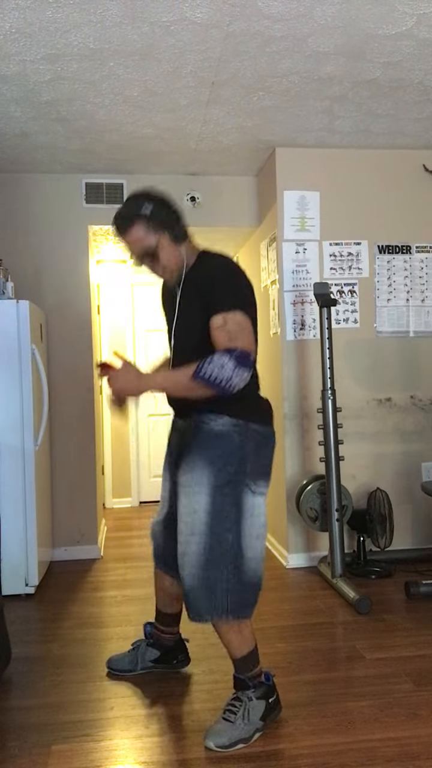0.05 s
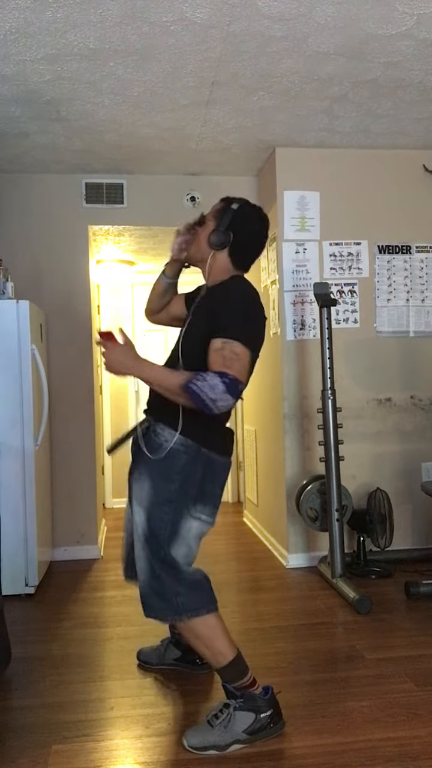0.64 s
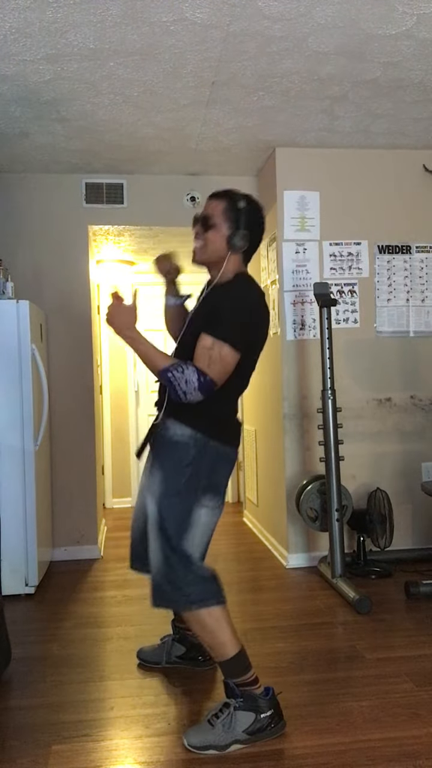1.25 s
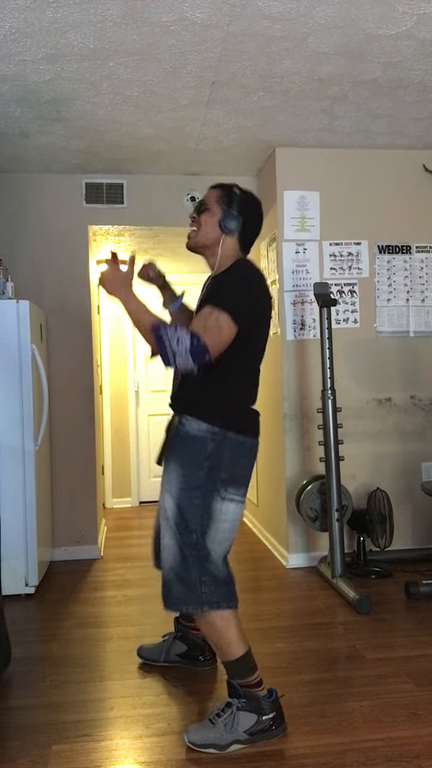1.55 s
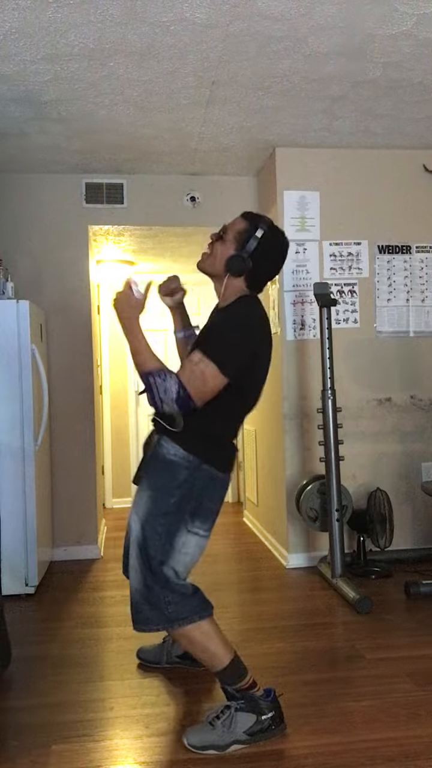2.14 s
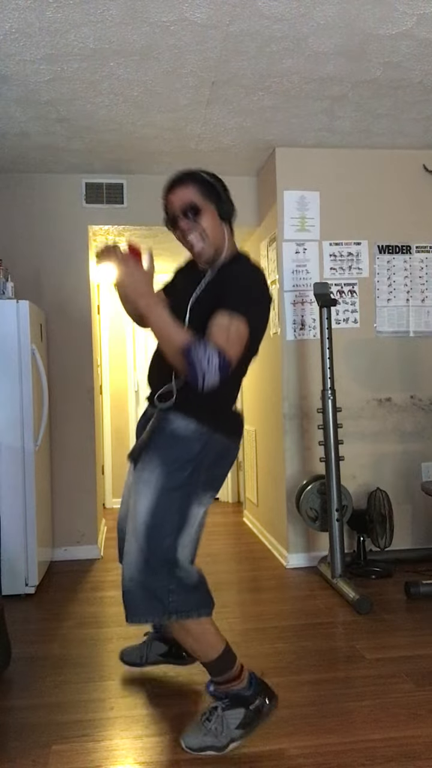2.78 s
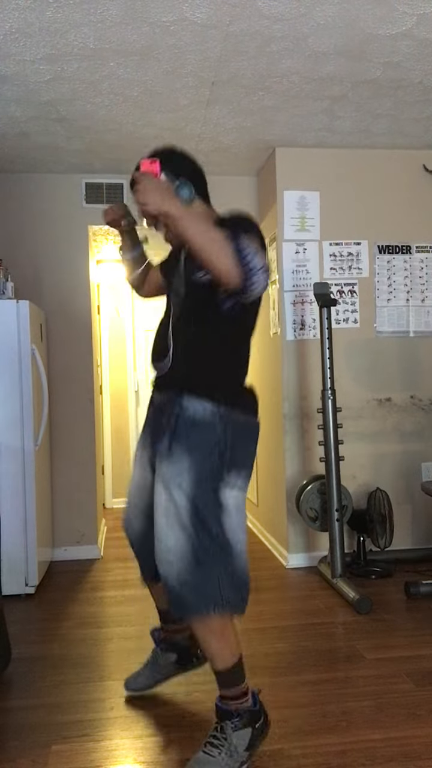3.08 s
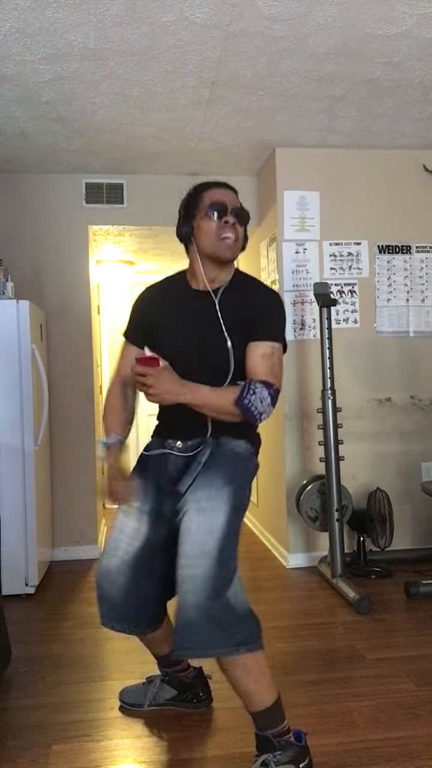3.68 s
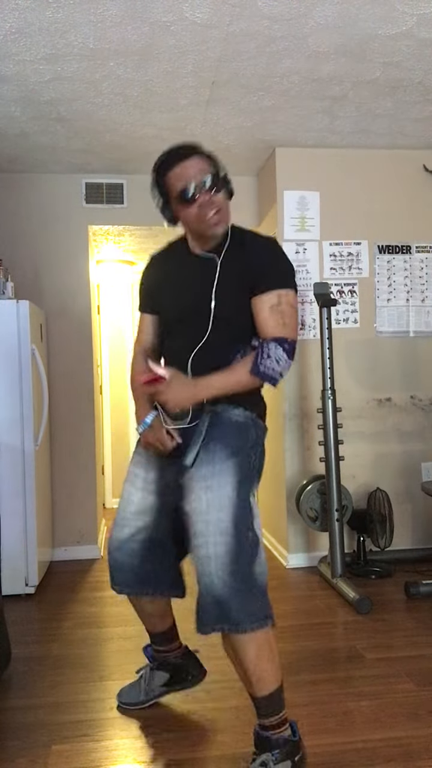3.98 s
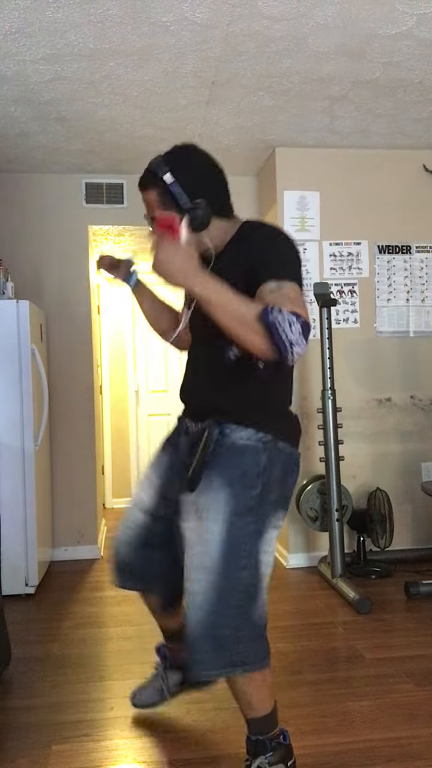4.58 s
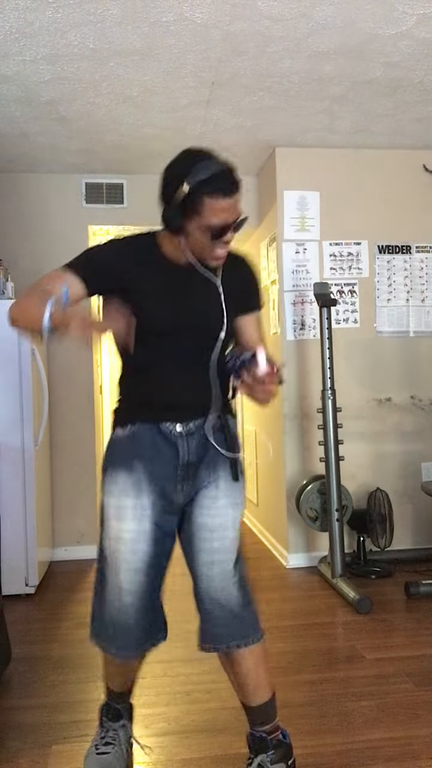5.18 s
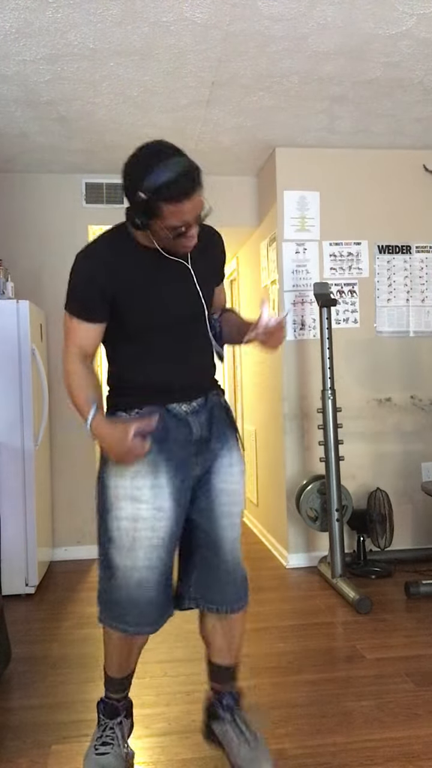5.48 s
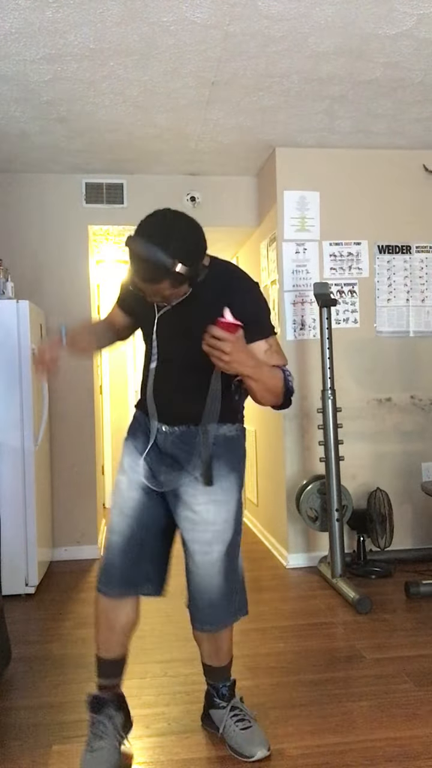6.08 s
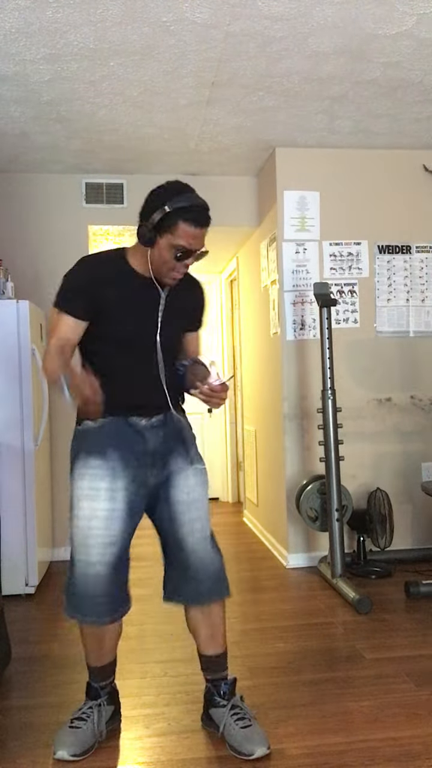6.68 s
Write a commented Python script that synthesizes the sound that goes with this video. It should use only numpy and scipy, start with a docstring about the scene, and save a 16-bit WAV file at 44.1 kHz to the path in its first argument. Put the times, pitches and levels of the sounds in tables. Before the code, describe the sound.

A refrigerator hums softly in an echoing room while sneakers move over wooden boards. The steps start light, with a scrape and a few knocks, pause briefly, then turn into louder, irregular stomps that slap and thud. Heel and toe taps, brief scuffs and the faint swish of denim fill the gaps. The sound is heard from within the room, with a short ring after each landing.

```python
"""Sneakers dancing on a wooden floor

Someone dances in a bare, ringing room. Each landing is a slap of the rubber sole, a knock
of the boards and a thud as the weight follows. In between, heels and toes tap, soles scuff,
denim rustles and a belt or cord ticks. A refrigerator hums underneath."""
import sys
import numpy as np
from scipy import signal
from scipy.io import wavfile
from scipy.ndimage import uniform_filter1d

SR = 44100
rng = np.random.default_rng(int(sys.argv[2]) if len(sys.argv) > 2 else 0)


def wav_out(sig):
    """Save sig, one row per channel (or a flat mono array), as 16-bit PCM at SR to the path in sys.argv[1]."""
    wavfile.write(sys.argv[1], SR, np.round(np.clip(np.atleast_2d(sig).T, -1, 1) * 32767).astype(np.int16))


N = 301186
HIT_SAMPLES = int(.7 * SR)   # one hit with its tail
BAND_EDGES_HZ = np.geomspace(28, 17500, 29)
BAND_CENTRES_HZ = np.sqrt(BAND_EDGES_HZ[1:] * BAND_EDGES_HZ[:-1])
CLICK = signal.unit_impulse(4096)


def from_db(db):
    """Decibels to gain."""
    return 10 ** (np.asarray(db) / 20)


def unit_rms(x):
    """Scale to unit rms."""
    return x / np.sqrt(np.mean(x ** 2) + 1e-20)


def at_level(x, db):
    """Give a hit the energy of this level held for a hundredth of a second."""
    return x * from_db(db) * np.sqrt(SR / 100 / np.sum(x ** 2))


def per_band(curve):
    """Read a frequency curve at the band centres, as a column."""
    hz, value = np.transpose(curve)
    return np.interp(np.log(BAND_CENTRES_HZ), np.log(hz), value)[:, None]


def add(out, s, sound):
    """Mix a sound in from time s."""
    start = round(s * SR)
    out[start:start + len(sound)] += sound[:N - start]


def cut(x, hz, kind, order=2):
    """Butterworth filter."""
    return signal.sosfilt(signal.butter(order, hz, kind, fs=SR, output="sos"), x + 1e-18)


def resonance(x, hz, width_hz):
    """Two-pole resonance with unit gain at its peak."""
    r = np.exp(-np.pi * width_hz / SR)
    poles = [1, -(1 + r * r) * np.cos(2 * np.pi * hz / SR), r * r]
    return signal.lfilter(np.array([1, 0, -1]) * (1 - r * r) / 2, poles, x + 1e-18)


def drift(turns_per_s):
    """A slow random wander."""
    position = np.arange(N) / SR * turns_per_s
    return np.interp(position, np.arange(2000), rng.standard_normal(2000))


def noise_bands():
    """White noise split into third octaves, each held at a steady level."""
    white = rng.standard_normal((2, N + HIT_SAMPLES))
    bands = np.array([cut(white[k % 2], BAND_EDGES_HZ[k:k + 2], "band")
                      for k in range(len(BAND_CENTRES_HZ))])
    power = uniform_filter1d(bands ** 2, size=2600, axis=1)
    steady = (bands / np.sqrt(power + 1e-20))[:, HIT_SAMPLES:]
    return steady * np.sqrt(np.diff(BAND_EDGES_HZ) * 2 / SR)[:, None]


def room(clicks, bands, direct=1.53, tail_db=-25.0, early_share=1.36, early_decay_s=.018):
    """Each click has its own spot and its own echoes, so their energies add and die band by band."""
    # tone of the reverb: f/Hz, gain/dB
    colour = [(45, 7), (90, -10), (170, -3.5), (225, 0.5), (330, 0), (600, 3), (900, -1.5), (1300, 5.5),
              (2500, 1.5), (4000, 2), (6300, -5), (8000, -12), (11000, -13), (15000, -22)]
    # reverb time: f/Hz, T60/s
    decay = [(100, 0.52), (260, 0.46), (700, 0.5), (1800, 0.51), (4800, 0.54), (8000, 0.46), (14000, 0.25)]
    start = rng.integers(N - len(clicks) + 1)
    energy = clicks ** 2 + 1e-18
    early = early_share * signal.lfilter([1], [1, -np.exp(-1 / (early_decay_s * SR))], energy)
    out = direct * cut(clicks, 5400, "low", order=3)
    for band, db, t60 in zip(bands, per_band(colour), per_band(decay)[:, 0]):
        late = signal.lfilter([1], [1, -1e-6 ** (1 / (t60 * SR))], energy)
        out += band[start:start + len(clicks)] * from_db(db + tail_db) * np.sqrt(early + late)
    return out


def floor_resonances(x):
    """Floor and room add their own pitches to a sound."""
    # resonances of floor and room: f/Hz, width/Hz, gain/dB
    modes = [(172, 14, -5), (189, 16, 1), (265, 18, 0), (328, 14, -2), (356, 26, 0), (521, 30, -4),
             (662, 28, -5), (784, 24, 0), (993, 22, -3), (1167, 18, -4), (1415, 40, -6), (1684, 30, -1),
             (2092, 24, -4), (2394, 34, -5), (2593, 50, -4), (5321, 30, -3)]
    return x + sum(from_db(db) * resonance(x, hz, width) for hz, width, db in modes)


def refrigerator(air_db=-60, waver_hz=0.89):
    """Slightly unsteady motor tones over a soft rush of air."""
    # airflow spectrum: f/Hz, relative level/dB
    airflow = [(30, -40), (70, -16), (110, -9), (170, 2), (220, -1), (340, 7), (440, -8.5), (700, -5.5),
               (1200, -20), (2500, -20.5), (6000, -50), (9000, -27.5), (15000, -36)]
    # motor tones: f/Hz, level/dB
    hum = [(177.6, -70.5), (264, -60.5), (296.5, -61.5), (1055, -73.5), (1389, -76.5)]
    rush = np.sum(noise_bands() * from_db(per_band(airflow)), axis=0)
    out = from_db(air_db) * unit_rms(rush)
    for hz, db in hum:
        phase = 2 * np.pi * np.cumsum(hz + waver_hz * drift(6.6)) / SR
        out += np.sqrt(2) * from_db(db) * np.sin(phase)
    return cut(out, 77, "high")


def denim(creases_per_s=260, uneven_db=5.0, sway_db=-69):
    """Denim creases slip in uneven grains, swelling above a faint sway with each swing of a leg."""
    # leg swings: t of the peak/s, half length/s, level/dB
    swings = [(0.01, 0.042, -50.5), (0.24, 0.092, -56), (1.135, 0.066, -58.5), (1.423, 0.062, -61.5),
              (1.707, 0.11, -57.5), (2.094, 0.032, -55.5), (2.414, 0.047, -52), (2.942, .1, -50.5),
              (3.729, 0.086, -55.5), (4.054, 0.074, -54), (4.323, 0.16, -56.5), (5.34, 0.066, -49),
              (5.558, 0.12, -51.5), (6.257, 0.052, -58.5), (6.83, .1, -54)]
    # tone of the cloth: f/Hz, relative level/dB
    spectrum = [(200, -27), (500, -2), (900, 1), (1400, -1), (3800, -0.5), (6300, -1.5), (8200, -4),
                (15000, -4.5)]
    t = np.arange(N) / SR
    swells = sum(from_db(db) * np.exp(-np.square((t - s) / half_s)) for s, half_s, db in swings)
    motion = from_db(sway_db) + swells
    slips = (rng.random(N) < creases_per_s / SR) * rng.choice([-1, 1], N)
    grains = slips * from_db(uneven_db * np.clip(rng.standard_normal(N), -2, 2))
    rub = room(unit_rms(grains) * motion, noise_bands() * from_db(per_band(spectrum)), direct=0.49)
    rustle = cut(floor_resonances(rub), 390, "high")
    return np.sqrt(np.mean(motion ** 2)) * unit_rms(rustle)


def contact(decay_s, attack, grains_per_s=2500):
    """Two surfaces meet: one click, weighted by attack, then a dying shower of small ones."""
    fade = np.exp(-np.arange(HIT_SAMPLES) / SR / max(decay_s, 1e-4))
    grains = rng.standard_normal(HIT_SAMPLES) * (rng.random(HIT_SAMPLES) < grains_per_s / SR) * fade
    clicks = grains / np.sqrt(np.sum(grains ** 2) + 1e-12)
    clicks[0] = attack
    return clicks / np.sqrt(np.sum(clicks ** 2))


def on_floor(bands, clicks, ring, db):
    """Clicks excite a ring, which passes through the floor's resonances and into the room."""
    return at_level(signal.fftconvolve(room(clicks, bands), floor_resonances(ring)), db)


def scuffs(bands, grit_db=-30.0):
    """Rubber drags over the boards in bursts of tiny slips."""
    # drags of the sole: t/s, decay/s, level/dB, f/Hz
    drags = [(0.36, 0.15, -29.5, 3130), (0.924, 0.017, -48.5, 3810), (2.426, 0.028, -40, 3000),
             (4.906, .011, -50.5, 2920), (5.43, 0.022, -35, 4350), (5.952, 0.021, -45.5, 4900)]
    out = np.zeros(N)
    for s, decay_s, db, hz in drags:
        slip = cut(resonance(CLICK, hz, 0.83 * hz), 330, "high", order=3)
        scrape = on_floor(bands, contact(decay_s, attack=0.25, grains_per_s=1200), slip, db)
        add(out, s, scrape + grit(bands, db + grit_db, decay_s))
    return out


def grit(bands, db, decay_s=.025):
    """Dust under a sliding sole crackles at the very top."""
    crackle = cut(CLICK, 16000, "high", order=3)
    return on_floor(bands, contact(decay_s, attack=.15, grains_per_s=900), crackle, db)


def footfall(bands, roll_s, layers):
    """Stack layers of (ring, level/dB, spread/s); the quicker the sole rolls down, the sharper the hit."""
    attack = .008 / (roll_s + .002)
    return sum(on_floor(bands, contact(spread_s, attack), ring, db) for ring, db, spread_s in layers)


def board_knock(hz):
    """Short, dull knock of the boards."""
    body = cut(resonance(CLICK, hz, 1.12 * hz), 200, "high", order=3)
    return cut(body, 2.0 * hz, "low")


def tread_crack():
    """Bright crack of the tread on the boards."""
    return cut(cut(CLICK, 2500, "high"), 6000, "low", order=1)


def taps(bands, grit_db=-32.0):
    """Heel or toe touches down without weight: a knock, a crack and a little grit."""
    # light touches: t/s, roll/s, knock/dB, knock f/Hz, crack/dB
    touches = [(0.4075, 0.0041, -32.5, 820, -33.5), (0.495, 0.051, -21.5, 660, -40),
               (3.008, 0.0083, -27, 920, -29), (3.322, 0.014, -36.5, 503, -44),
               (3.480, .002, -26, 530, -39.5), (4.152, 0.011, -39, 870, -40),
               (5.766, 0.019, -22.5, 630, -34)]
    out = np.zeros(N)
    for s, roll_s, knock_db, knock_hz, crack_db in touches:
        layers = [(board_knock(knock_hz), knock_db, 1.3 * roll_s),
                  (tread_crack(), crack_db, 2.4 * roll_s)]
        add(out, s, footfall(bands, roll_s, layers) + grit(bands, crack_db + grit_db))
    return out


def sole_slap(bands, roll_s, weight_db, hardness_db, slap_db, slap_hz):
    """The sole lands: air claps out under it, the tread cracks and the boards knock."""
    clap = resonance(CLICK, slap_hz, 0.77 * slap_hz)
    pocket = resonance(CLICK, slap_hz, 0.024 * slap_hz)   # the hollow under the sole rings briefly
    slap = cut(clap + 0.47 * pocket, 4200, "low", order=1)
    layers = [(slap, slap_db, roll_s),
              (tread_crack(), weight_db + hardness_db, 2.8 * roll_s),
              (board_knock(hz=696), weight_db + 1.5 + 0.22 * hardness_db, 1.3 * roll_s)]
    return footfall(bands, roll_s, layers)


def weight_thud(bands, roll_s, weight_db, hardness_db):
    """One short push: the floor thuds, the joists shake, and a hard landing makes the boards boom."""
    body = resonance(CLICK, hz=176.0, width_hz=120)
    thud = cut(cut(body, 160, "high", order=4), 310, "low")
    joists = resonance(CLICK, hz=55, width_hz=45)
    boom = board_knock(hz=351)
    push_s = 0.49 * roll_s
    layers = [(thud, weight_db, push_s),
              (joists, weight_db - 37.5, push_s),
              (boom, weight_db + 2 + 0.85 * hardness_db, push_s)]
    return footfall(bands, roll_s, layers)


def stomps(bands, weight_lag_s=.007):
    """Full landings: the sole slaps, the weight follows and the tread grinds as it settles."""
    # landings: t/s, roll/s, weight/dB, hardness of the contact/dB, slap/dB, slap f/Hz
    landings = [ (0.519, .012, -23, -6.5, -36, 1370), (1.247, 0.019, -36.5, -11, -39.5, 1370),
                (2.6710, 0.0026, -24, 4.5, -13.5, 1690), (3.076, 0.0033, -20, 4.5, -20, 1620),
                (3.492, 0.009, -17.5, -7.5, -14, 1830), (4.253, 0.021, -32.5, -15.5, -56.5, 1150),
                (4.555, 0.0027, -25.5, -24, -27, 1750), (5.056, 0.012, -12, 2.5, -17.5, 1750),
                (5.795, 0.021, -23, -27, -25, 1950), (6.5754, 0.0025, -20.5, 4, -14, 2730)]
    out = np.zeros(N)
    for s, roll_s, weight_db, hardness_db, slap_db, slap_hz in landings:
        add(out, s, sole_slap(bands, roll_s, weight_db, hardness_db, slap_db, slap_hz))
        add(out, s + weight_lag_s, weight_thud(bands, roll_s, weight_db, hardness_db))
        add(out, s + weight_lag_s, grit(bands, db=-45 + .45 * weight_db))
    return out


def belt_ticks(bands, rattle_s=0.0041):
    """A belt or cord taps lightly and rings briefly."""
    # ticks: t/s, level into the room/dB
    ticks = [(1.482, -53.5), (1.716, -53), (1.826, -63)]
    # resonances of belt or cord: f/Hz, width/Hz, relative level/dB
    modes = [(2557, 350, 4), (3480, 250, 2), (3780, 450, -5), (4670, 510, -3), (5900, 500, -4)]
    ring = sum(from_db(db) * resonance(CLICK, hz, width) for hz, width, db in modes)
    out = np.zeros(N)
    for s, db in ticks:
        rattle = room(contact(rattle_s, attack=0.81), bands)
        add(out, s, signal.fftconvolve(rattle, at_level(ring, db)))
    return out


def scene():
    """Feet, clothes and refrigerator in a mono mix."""
    bands = noise_bands()
    feet = stomps(bands) + taps(bands) + scuffs(bands)
    clothes = denim() + belt_ticks(bands)
    return (feet + clothes + refrigerator())[None, :]


def record(dry):
    """A soft clip rounds the hardest peaks and a steep low-pass trims the top."""
    ceiling, cutoff_hz = .85, 16000
    rounded = dry / (1 + (dry / ceiling) ** 4) ** (1 / 4)
    return signal.sosfilt(signal.ellip(10, .1, 80, cutoff_hz, fs=SR, output="sos"), rounded)


dry = scene()
out = record(dry)
wav_out(out)
```